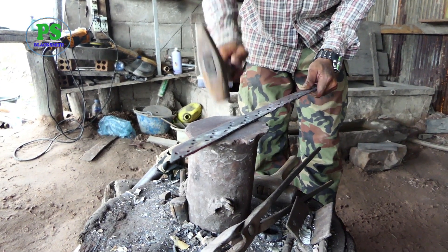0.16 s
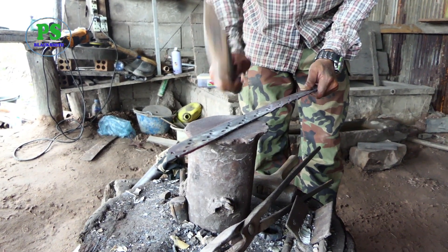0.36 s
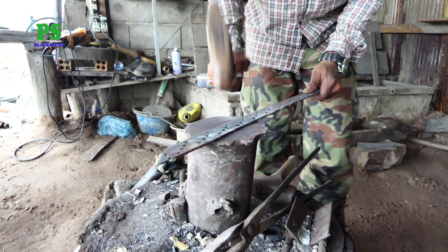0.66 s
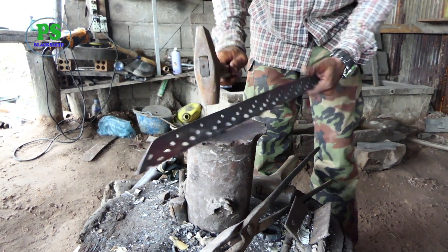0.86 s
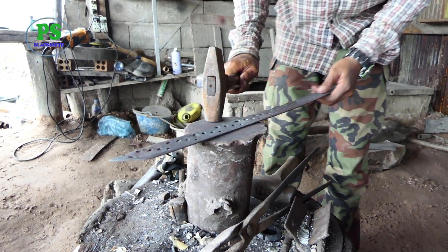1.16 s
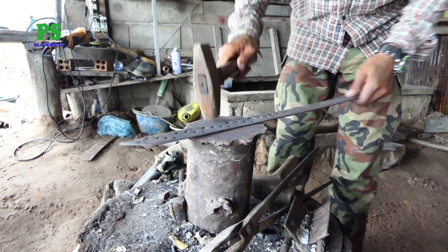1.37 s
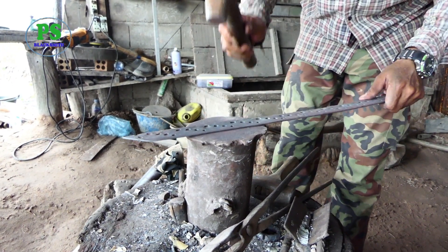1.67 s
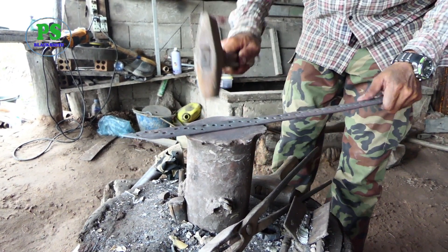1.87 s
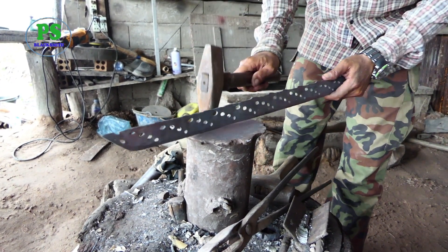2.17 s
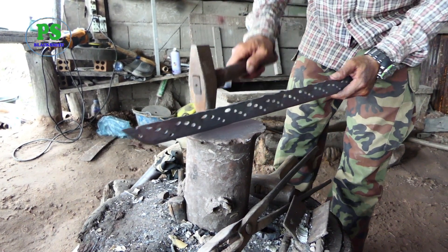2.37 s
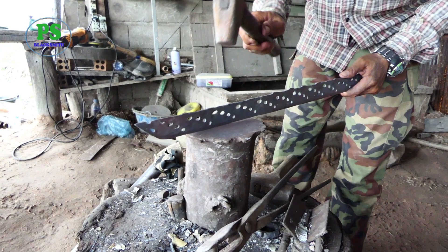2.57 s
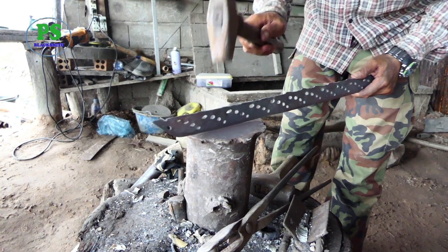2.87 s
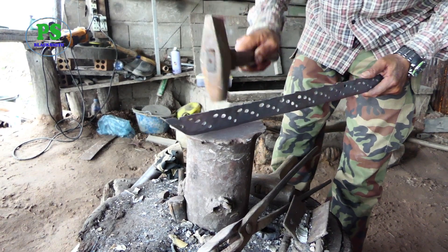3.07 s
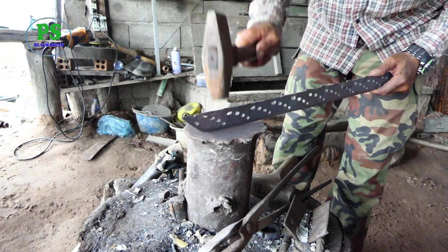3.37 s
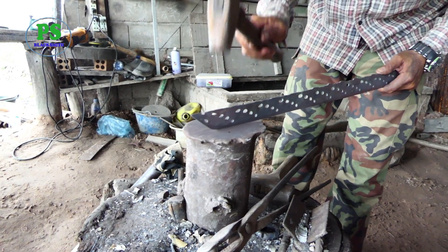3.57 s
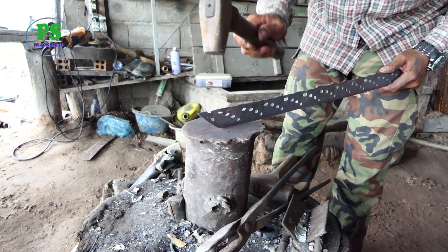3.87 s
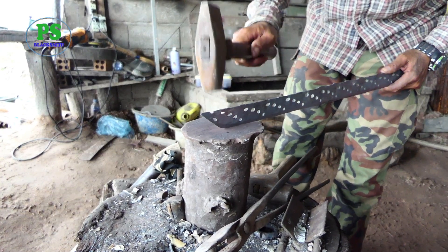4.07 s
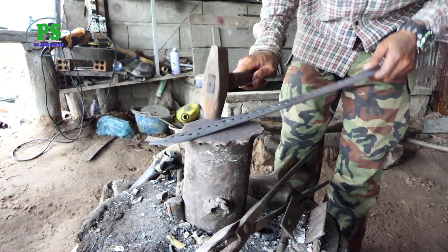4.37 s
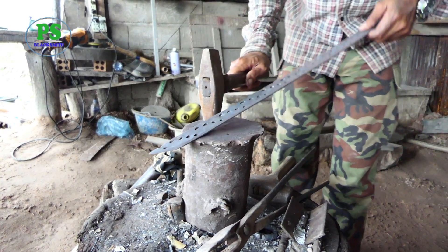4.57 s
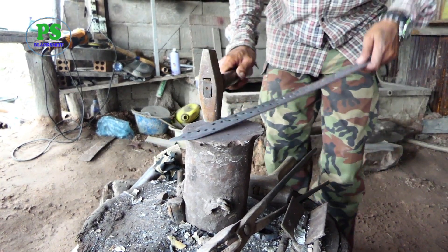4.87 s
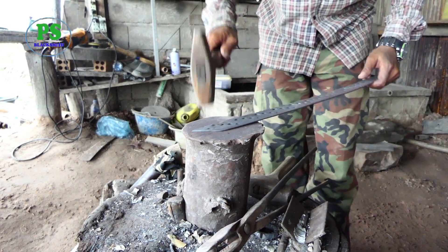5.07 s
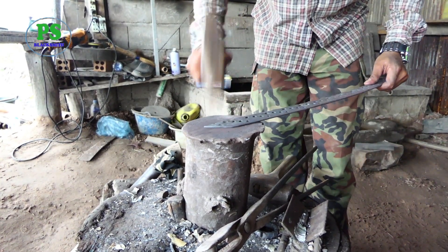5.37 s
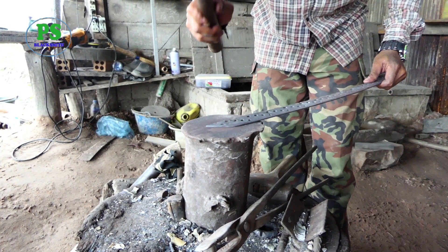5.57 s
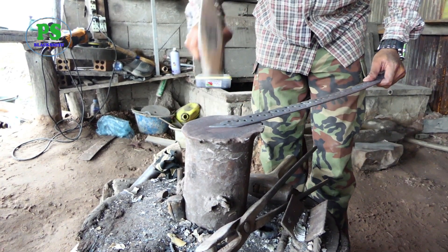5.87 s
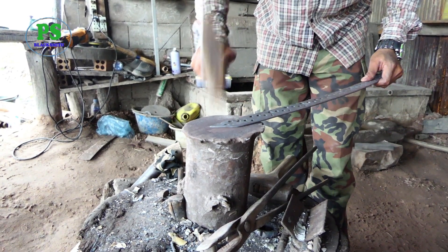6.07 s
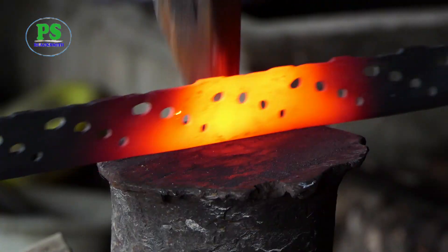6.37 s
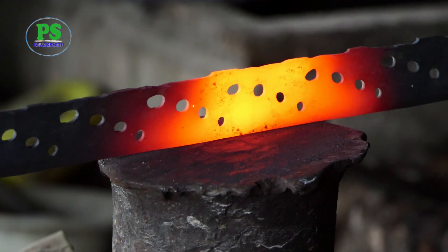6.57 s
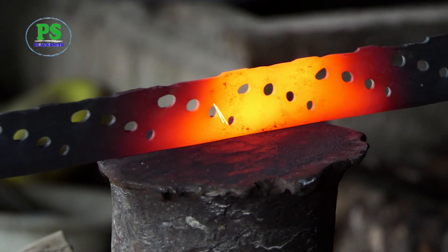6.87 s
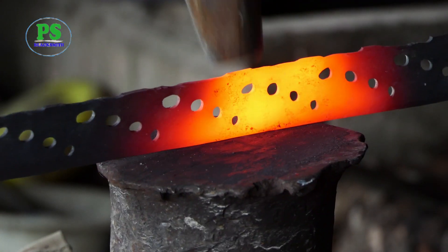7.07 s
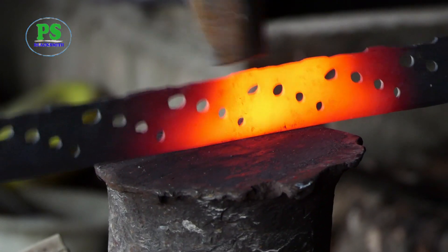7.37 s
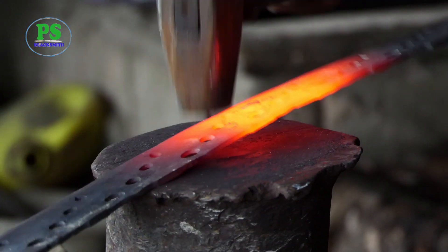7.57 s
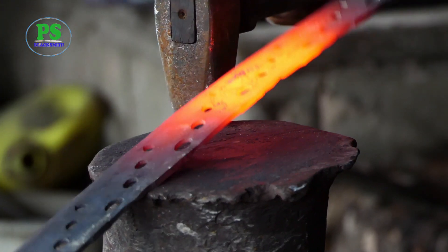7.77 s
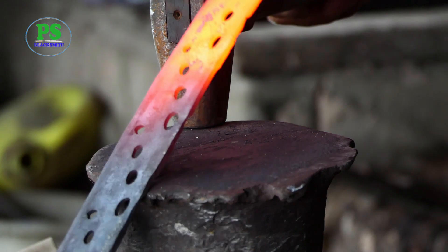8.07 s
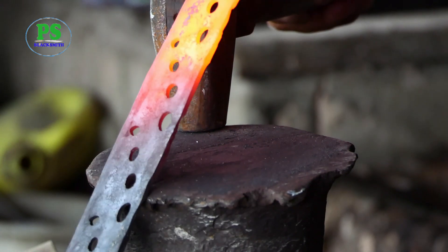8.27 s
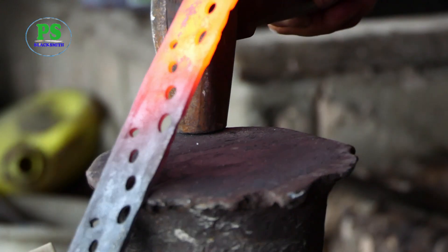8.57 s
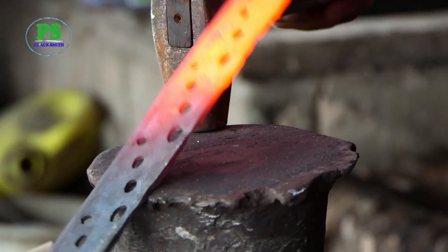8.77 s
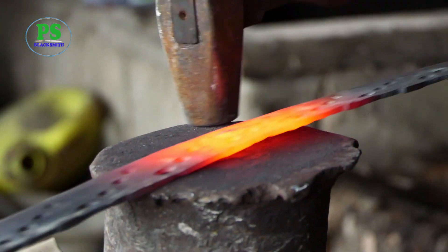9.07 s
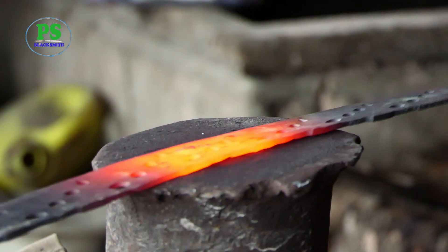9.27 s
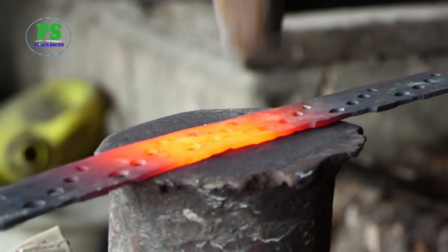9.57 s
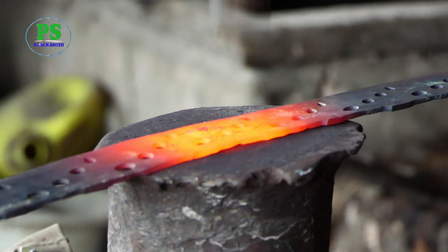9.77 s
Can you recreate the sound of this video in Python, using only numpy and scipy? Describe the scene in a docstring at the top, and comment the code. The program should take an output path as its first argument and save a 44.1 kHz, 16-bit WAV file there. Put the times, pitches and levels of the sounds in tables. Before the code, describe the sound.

Three hard clanks on a bar, then a dropped hammer tapping the anvil with a quick ringing scrape. More blows follow, some lighter and brighter, with bouncing taps in the gaps and three heavy strikes before a short cut to silence. Then closer blows over a fuller forge hiss, another bounce and slide, a pause, and a last clank. Short shed reflections, compressed microphone level.

```python
"""Hammer blows on a hot steel bar on an anvil: noise cracks plus decaying sines of bar and hammer head.
Between runs the hammer drops on the bare anvil and bounces, and the bar slides: grains excite its ring.
Behind are forge hiss (shaped noise with a low drone), swells of low noise and the shed's reflections.
Gain control ducks everything at blows, sinks through a run and recovers in the pauses.
After a short silent cut the work goes on with a louder forge, heard from closer by."""
import sys
import numpy as np
from scipy import signal
from scipy.fft import rfft, irfft, next_fast_len
from scipy.io import wavfile
from scipy.ndimage import uniform_filter1d, minimum_filter1d

SR = 44100
rng = np.random.default_rng(int(sys.argv[2]) if len(sys.argv) > 2 else 0)


def wav_out(sig):
    """Save sig, one row per channel (or a flat mono array), as 16-bit PCM at SR to the path in sys.argv[1]."""
    wavfile.write(sys.argv[1], SR, np.round(np.clip(np.atleast_2d(sig).T, -1, 1) * 32767).astype(np.int16))


N = 437031
TIME = np.arange(N) / SR
RING_TIME = TIME[:SR // 4]

# forge hiss from afar and from close: freq_hz, relative density_db_per_hz
HISS_FAR_SPECTRUM = [(25, -51), (45, -27), (70, -13.5), (134, -9), (170, -3.5), (277, -2), (545, -6.5),
                     (988, -2), (1370, -1.5), (3000, -5.5), (5000, -10), (7920, -19), (9570, -16.5),
                     (16000, -39.5)]
HISS_NEAR_SPECTRUM = [(25, -33), (100, -12), (161, -2.5), (290, -2.5), (463, -5.5), (1020, -1.5),
                      (1480, -1.5), (1650, -3.5), (2760, -4.5), (4030, -9.5), (5570, -11), (7920, -20.5),
                      (9500, -16.5), (16000, -39.5)]
# low drone and hollows of the shed: freq_hz, width_hz, change_db to the hiss
DRONE_PEAKS = [(164.5, 21, 2.5), (269, 86, 1.5), (486, 160, -3.5), (1024, 72, 1.5)]
# low noise swells, deep rumble early, fuller bass of the close forge late:
# peak_s, half_length_s (to 1/e), pitch_hz, level_db
LOW_SWELLS = [(1.7, .45, 57, -49), (2.8, 0.23, 106, -48.5), (9, 0.76, 118.5, -39.5)]
# left-right likeness of diffuse sound: freq_hz, likeness (0-1)
STEREO_LIKENESS = [(60, 0.86), (110, 0.85), (200, 0.96), (380, 0.9), (700, 0.8), (1290, 0.68), (2380, 0.62),
                   (4400, 0.89), (8120, 0.96), (15000, 0.23)]
# decay of the shed: freq_hz, t60_s
SHED_DECAY = [(200, 0.34), (1200, 0.37), (4000, 0.2), (9000, 0.17), (15000, 0.18)]
# reflections off floor, smith and walls: delay_s, gain (before the sideways colour)
NEAR_ECHOES = [(.0066, 0.3), (.0076, 0.11), (0.0129, .14), (0.0219, 0.073)]
# what the anvil radiates sideways to floor and walls: freq_hz, width_hz, change_db to the reflections
SIDEWAYS_PEAKS = [(1335, 200, -0.5), (2950, 180, 1.5), (4300, 1300, -6), (4830, 310, 7)]
# bar sliding on the anvil: start_s, end_s, level_db, grit_db relative to ring
BAR_SLIDES = [(1.08, 1.163, -22.5, -20), (1.136, 1.185, -23.5, 2), (7.628, 7.664, -26.5, 10)]
# bar ringing freely as it slides: freq_hz, t60_s, relative level_db
SLIDE_MODES = [(6060, 0.11, -1.5), (6330, 0.1, -5), (6580, .08, -13), (6860, .08, -9.5), (7200, .08, -5),
               (7770, .08, -17.5), (8650, .08, -4.5), (9900, .08, -15.5), (11700, .08, -22)]
# hammer dropped on the bare anvil: start_s, force_db, head_ring_db relative to force, first_flight_s,
# flight_kept (ratio per bounce), bounce_loss_db, touches (count)
HAMMER_DROPS = [(1.037, 4, 1, 0.078, .7, 5.5, 2), (2.1909, 4.5, 0.5, .0987, .777, 5, 3),
                (4.3938, 5, 2.5, .0936, .65, 4, 4), (7.687, 8.5, -3, .0775, .7, 3, 2)]
# contact noise on the bare anvil: freq_hz, relative density_db_per_hz
KNOCK_SPECTRUM = [(40, -32), (250, -2), (500, -18), (1200, 0), (2100, -3.5), (3000, 2), (4500, 0.5),
                  (6000, -11), (7500, -22), (11000, -22.5), (14000, -41)]
# anvil and hammer-head modes: freq_hz, t60_s, relative level_db
ANVIL_MODES = [(290, 0.034, -28), (825, 0.023, -16), (1373, 0.035, -18.5), (2940, 0.032, -17),
               (3054, 0.081, -24.5), (3860, 0.021, -14.5), (4260, 0.0066, -20), (5037, 0.019, -14)]
HEAD_MODES = [(8910, 0.081, -13.5), (10900, .08, -38), (11500, .12, -37)]
# blows on the bar: start_s, force_db, place (A-D), treble_db, head_ring_db relative to force
BAR_BLOWS = [(0.2311, 9, "A", -4, -13), (.527, 9.5, "A", -3.5, -6), (0.8115, 8.5, "A", -5, -2),
             (1.8903, 8, "B", -0.5, -2), (2.8217, 1, "C", 6.5, -4), (2.863, -6.5, "C", -6, -12),
             (3.136, 2.5, "C", -1, 7.5), (3.4478, 4, "C", 1.5, 8.5), (3.472, -12, "C", -2, -6),
             (3.7626, 0, "C", 5.5, 3), (4.0711, .5, "C", 2.5, -3), (5.5109, 9.5, "B", 0, 2),
             (5.8649, 10, "B", -6, -2.5), (6.1916, 10.5, "B", -4.5, -3), (6.826, 5, "D", 1, -2),
             (7.156, 6, "D", -4.5, -19), (7.4649, 2.5, "D", 5.5, 3), (9.5946, 7, "B", -1.5, 0.5)]
# bar pinned on the anvil: freq_hz, t60_s, then relative level_db struck at A, B, C, D
BAR_MODES = [(868, 0.043, -35, -45, -43, -14.5), (1330, 0.023, -13, -15.5, -14.5, -16),
             (1497, 0.023, -34, -21, -11, -29), (1750, .025, -37.5, -17, -27.5, -26),
             (2960, 0.034, -18, -15, -37, -31), (3720, 0.027, -32, -24.5, -22.5, -32),
             (3896, 0.042, -18, -21.5, -11.5, -24), (4430, 0.015, -7.5, -16, -29, -14),
             (5045, 0.032, -25, -19.5, -38, -23.5), (5660, 0.066, -40, -42, -12.5, -18),
             (6130, .05, -31, -36, -38.5, -28), (7430, 0.036, -18.5, -22, -14, -39),
             (8740, 0.097, -36.5, -26, -34, -33), (9140, 0.046, -30.5, -21, -13.5, -25),
             (9370, 0.042, -33, -26.5, -17.5, -29), (9750, 0.11, -20, -29, -28, -35),
             (10050, 0.13, -19, -27.5, -30, -25), (10400, 0.079, -38.5, -34.5, -38.5, -30),
             (11230, 0.1, -39, -41, -28.5, -40), (11430, 0.087, -28.5, -24.5, -41, -43),
             (12300, .07, -37, -36, -43, -44), (13800, .06, -38.5, -34, -26, -44),
             (15400, .08, -47, -47, -46, -54)]
# contact noise on hot steel: freq_hz, relative density_db_per_hz
CRACK_SPECTRUM = [(40, -30.5), (250, -13), (500, -9.5), (1200, -2), (2200, -4.5), (4200, 3), (6000, -1),
                  (8000, -6.5), (10500, -6), (13000, -9.5), (16000, -15)]
# silent cut: start_s, end_s
CUT_START_S, CUT_END_S = (6.262, 6.448)

FORGE_FAR_DB, FORGE_NEAR_DB = -24, -18.5  # before and after the cut
STIRRING_DB_PER_DB = 0.47  # extra room feed per dB of blow force
HEAD_LOSS_DB = 6  # head ring, relative to force, lost per bounce
EDGE_HZ = 15900  # band limit


def amp(db):
    """Decibels to gain."""
    return 10 ** (np.asarray(db) / 20)


def evened(x):
    """Scales to an rms of 1."""
    return x / np.sqrt(np.mean(x ** 2) + 1e-20)


def read(points, hz):
    """Interpolates a table on a log-frequency axis."""
    f, value = np.transpose(points)
    return np.interp(np.log(hz + 1), np.log(f + 1), value)


def humps(peaks, hz):
    """Sums resonance-shaped peaks and dips into a curve in dB."""
    return sum(db / (1 + (2 * (hz - f) / width) ** 2) for f, width, db in peaks)


def level(points):
    """A curve of (time_s, level_db) as a gain for every sample."""
    return amp(np.interp(TIME, *np.transpose(points)))


def add(mix, start_s, sound):
    """Mixes a sound in at start_s."""
    part = mix[round(start_s * SR):][:len(sound)]
    part += sound[:len(part)]


def coloured(x, gain):
    """Filters x by a gain that is a function of frequency."""
    length = x.shape[-1]
    size = next_fast_len(length + 1024)
    spectrum = rfft(x, size) * gain(np.fft.rfftfreq(size, 1 / SR))
    return irfft(spectrum, size)[..., :length]


def stereo(pair):
    """Mixes two unrelated signals as mid and side, so left and right are alike by frequency."""
    def likeness(hz):
        return np.clip(read(STEREO_LIKENESS, hz), 0, .995)

    mid = coloured(pair[0], lambda hz: np.sqrt((1 + likeness(hz)) / 2))
    side = coloured(pair[1], lambda hz: np.sqrt((1 - likeness(hz)) / 2))
    return np.array([mid + side, mid - side])


def ring(modes, detune=0.0015):
    """Decaying sines of alternating sign, each slightly detuned at random."""
    hz, t60_s, level_db = np.transpose(modes)[:, :, None]
    hz = hz * (1 + detune * rng.standard_normal(hz.shape))
    sign = np.cos(np.pi * np.arange(len(hz)))[:, None]
    waves = sign * np.sin(2 * np.pi * hz * RING_TIME)
    decay = amp(level_db - 60 * RING_TIME / t60_s)
    onset = 1 - np.exp(-RING_TIME / 0.00049)
    return (decay * waves).sum(0) * onset


def contact(spectrum, rise_s):
    """A noise burst of a few milliseconds while steel crushes against steel."""
    u = RING_TIME / rise_s
    shape = u * np.exp(1 - u)
    noise = rng.standard_normal(len(u))
    burst = coloured(noise, lambda hz: amp(read(spectrum, hz))) * shape
    # small steel parts radiate no deep bass
    burst = signal.lfilter(*signal.butter(2, 180, "high", fs=SR), burst)
    return burst * np.linalg.norm(shape) / np.linalg.norm(burst)


def hiss(spectrum, flutter_db=0.8):
    """Rushing air of the forge with a low drone: shaped noise, its level fluttering a little."""
    noise = rng.standard_normal((2, N))
    air = coloured(noise, lambda hz: amp(read(spectrum, hz) + humps(DRONE_PEAKS, hz)))
    flutter = np.interp(TIME, np.linspace(0, TIME[-1], num=300), rng.standard_normal(300))
    return evened(stereo(air)) * amp(flutter_db * flutter)


def low_swells(width_share=.17):
    """Low narrow-band noise that swells and fades."""
    out = np.zeros(N)
    for peak_s, half_s, pitch_hz, level_db in LOW_SWELLS:
        noise = rng.standard_normal(N)
        band = coloured(noise, lambda hz: np.exp(-((hz / pitch_hz - 1) / width_share) ** 2))
        swell = np.exp(-((TIME - peak_s) / half_s) ** 2)
        out += amp(level_db) * swell * evened(band)
    return out


def shed(x, tail_db=-3.0, build_s=0.0031):
    """Convolves with near reflections and a short diffuse tail that decays by frequency."""
    hz, t, z = signal.stft(rng.standard_normal((2, SR // 2)), SR, nperseg=256)
    decay = amp(-60 * t / read(SHED_DECAY, hz)[:, None])
    tail = signal.istft(z * decay, SR, nperseg=256)[1]
    build = 1 - np.exp(-(TIME[:tail.shape[1]] / build_s) ** 2)
    tail = stereo(tail * build)
    response = amp(tail_db) * tail / np.linalg.norm(tail[0])
    for delay_s, gain in NEAR_ECHOES:
        response[:, round(delay_s * SR)] += gain
    response = coloured(response, lambda hz: amp(humps(SIDEWAYS_PEAKS, hz)))
    return signal.oaconvolve(x[None], response, axes=1)[:, :N]


def slides():
    """Grains of scale catch under the sliding bar and set it ringing."""
    out = np.zeros(N)
    grit_points = [(1000, -23), (6000, 0.5), (10500, -1.0), (15000, -20)]  # freq_hz, relative level_db
    for start_s, end_s, level_db, grit_db in BAR_SLIDES:
        progress = np.clip(RING_TIME / (end_s - start_s), 0, 1)
        stroke = np.sqrt(np.maximum(np.sin(np.pi * progress), 0))
        grains = stroke * rng.standard_normal(len(RING_TIME)) ** 3  # cubing makes them sparse
        singing = signal.fftconvolve(grains, ring(SLIDE_MODES, detune=.0005))[:len(grains)]
        grit = coloured(grains, lambda hz: amp(read(grit_points, hz)))
        scrape = evened(singing) + amp(grit_db) * evened(grit)
        add(out, start_s, amp(level_db) * scrape * np.linalg.norm(stroke) / np.linalg.norm(scrape))
    return out


def bounces():
    """Yields each touch of a dropped hammer, sooner and softer than the last: time_s, force_db, head_db."""
    for start_s, force_db, head_db, flight_s, kept, loss_db, touches in HAMMER_DROPS:
        for k in range(round(touches)):
            touch_s = start_s + flight_s * np.sum(kept ** np.arange(k))
            yield touch_s, force_db - k * loss_db, head_db - k * HEAD_LOSS_DB


def taps(knock_db=-10.0, anvil_db=.5, room_db=2, head_room_db=-7):
    """Loose hammer on bare anvil: a duller knock, anvil and head ringing; returns direct and room feed."""
    direct, feed = np.zeros((2, N))
    for touch_s, force_db, head_db in bounces():
        knock = amp(knock_db) * contact(KNOCK_SPECTRUM, rise_s=0.0012)
        hit = knock + amp(anvil_db) * ring(ANVIL_MODES)
        head = amp(head_db) * ring(HEAD_MODES, detune=0.00028)
        add(direct, touch_s, amp(force_db) * (hit + head))
        add(feed, touch_s, amp(force_db) * (amp(room_db) * hit + amp(head_room_db) * head))
    return direct, feed


def blows(crack_db=-9.5, bar_db=0, thud_db=1, room_db=-3.0, head_room_db=-4):
    """Blows crack, ring bar (by place) and head; harder ones stir the shed more; returns direct and feed."""
    direct, feed = np.zeros((2, N))
    bar = np.array(BAR_MODES)
    for start_s, force_db, place, treble_db, head_db in BAR_BLOWS:
        modes = bar[:, [0, 1, 2 + "ABCD".index(place)]]
        crack = amp(crack_db) * contact(CRACK_SPECTRUM, rise_s=0.0013)
        hit = crack + amp(bar_db) * ring(modes)
        tone = [(1500, thud_db), (3500, 0), (5000, 0), (10000, treble_db)]  # freq_hz, change_db
        hit = coloured(hit, lambda hz: amp(read(tone, hz)))
        head = amp(head_db) * ring(HEAD_MODES, detune=0.00067)
        add(direct, start_s, amp(force_db) * (hit + head))
        feed_db = force_db + room_db + STIRRING_DB_PER_DB * force_db
        add(feed, start_s, amp(feed_db) * (hit + amp(head_room_db) * head))
    return direct, feed


def scene():
    """Hammer work in the shed over the forge, which is louder from the closer position."""
    struck, struck_feed = blows()
    dropped, dropped_feed = taps()
    slid = slides()
    far = amp(FORGE_FAR_DB) * hiss(HISS_FAR_SPECTRUM)
    near = amp(FORGE_NEAR_DB) * hiss(HISS_NEAR_SPECTRUM)
    forge = np.where(TIME < (CUT_START_S + CUT_END_S) / 2, far, near)
    room = shed(struck_feed + dropped_feed + slid)
    mix = struck + dropped + slid + room + forge + low_swells()
    return mix * amp([[-.15], [.15]])  # left, right balance in dB


def excess(x, threshold_db, hold_s=0.066, release_s=0.1):
    """Decibels by which 2 ms power passes a threshold, held and then released exponentially."""
    power = uniform_filter1d((x ** 2).mean(0), size=88)
    power_db = 10 * np.log10(abs(power) + 1e-12)
    over_db = np.maximum(power_db - threshold_db, 1e-6)
    size = 2 * round(hold_s * SR / 2) + 1
    held_db = -minimum_filter1d(-over_db, size, origin=size // 2)  # running maximum
    # a running maximum on a tilted log axis gives the exponential release
    tilt = TIME / release_s
    return np.exp(np.maximum.accumulate(np.log(held_db) + tilt) - tilt)


def slow_gain_control(x, threshold_db=-13.0, slope=1.154, memory_s=1.22, start_db=9):
    """Gain sinks as peaks pile up and recovers in pauses; starts low in mid-work, afresh after the cut."""
    before, after = np.split(excess(x, threshold_db), [round(CUT_END_S * SR)])
    r = np.exp(-1 / (memory_s * SR))

    def piled(over_db, first_db):
        return signal.lfilter([1 - r], [1, -r], slope * over_db, zi=[first_db])[0]

    return x * amp(-np.concatenate([piled(before, start_db), piled(after, 0)]))


def gain_control(x, threshold_db=-13.5, slope=0.75, attack_s=0.0023):
    """Gain falls just after a loud peak, holds, and creeps back."""
    r = np.exp(-1 / (attack_s * SR))
    cut_db = slope * signal.lfilter([1 - r], [1, -r], excess(x, threshold_db))
    return x * amp(-cut_db)


def record(dry):
    """Slow and quick gain control, clipping at full scale, the silent cut and the band limit."""
    loud = np.clip(gain_control(slow_gain_control(dry)), -1, 1)
    mute = level([(CUT_START_S, 0), (CUT_START_S + .002, -18), (CUT_START_S + .035, -55),
                  (CUT_END_S - .001, -75), (CUT_END_S, 0)])
    lowpass = signal.firwin(255, EDGE_HZ, window=("kaiser", 8), fs=SR)
    return signal.oaconvolve(loud * mute, lowpass[None], "same", axes=1)


dry = scene()
out = record(dry)
wav_out(out)
```